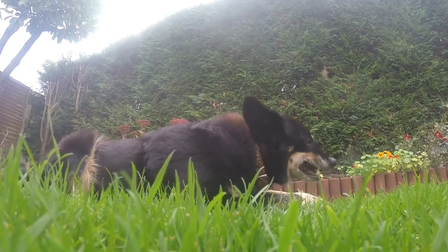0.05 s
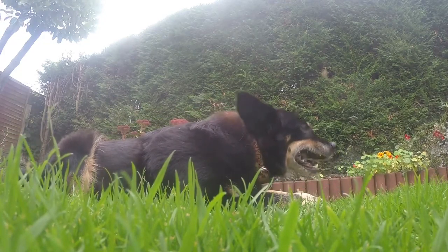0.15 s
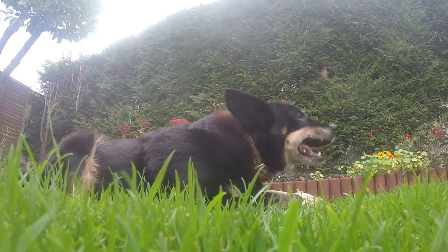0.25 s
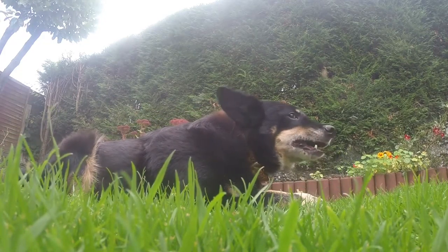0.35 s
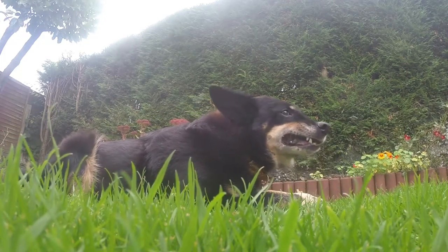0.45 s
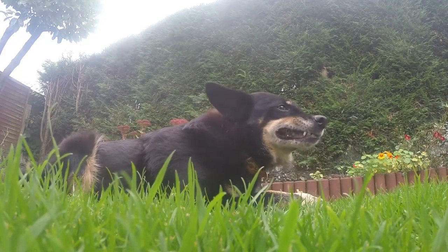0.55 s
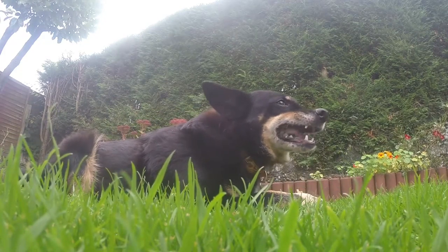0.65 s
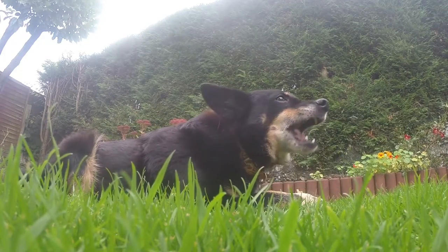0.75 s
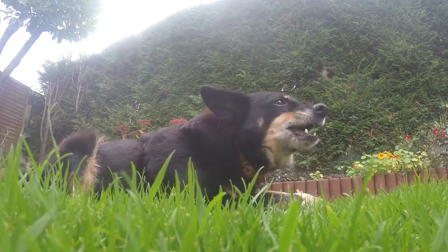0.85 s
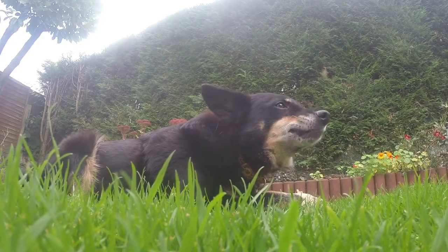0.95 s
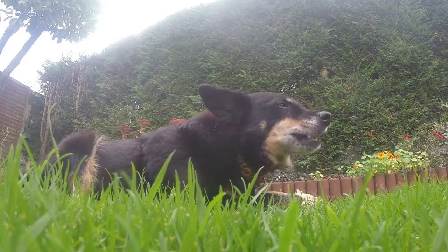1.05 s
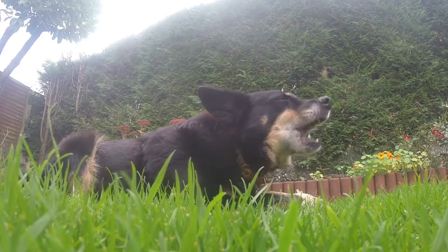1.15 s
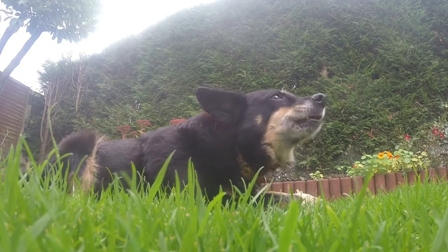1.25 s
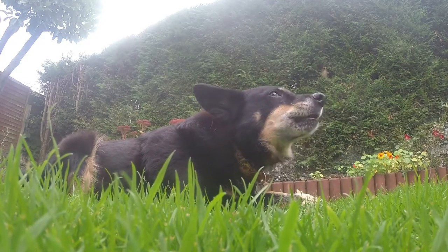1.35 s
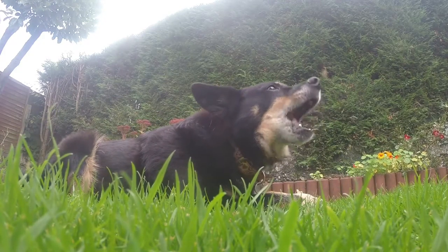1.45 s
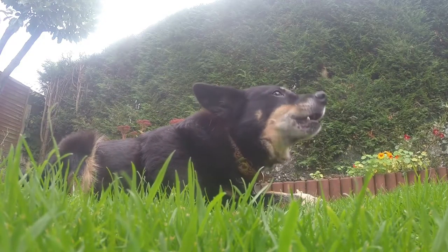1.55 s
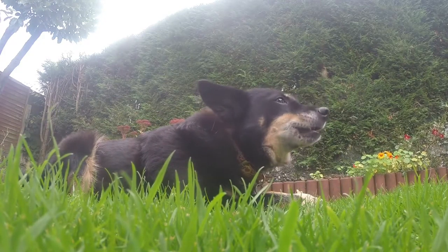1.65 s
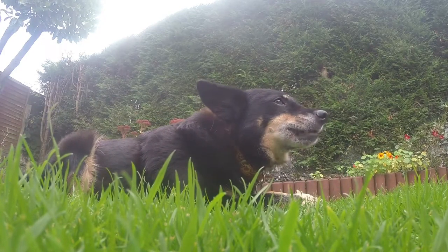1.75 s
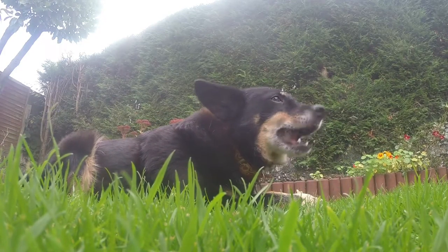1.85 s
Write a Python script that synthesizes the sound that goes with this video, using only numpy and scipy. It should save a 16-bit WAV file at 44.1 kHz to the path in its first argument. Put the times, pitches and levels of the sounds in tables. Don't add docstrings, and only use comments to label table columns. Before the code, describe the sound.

After two seconds of steady microphone hiss, a dog bites and cracks a bone on grass, then gnaws with scattered small clicks.

```python
import sys
import numpy as np
from scipy import signal
from scipy.fft import rfft, irfft, next_fast_len
from scipy.io import wavfile
from scipy.ndimage import map_coordinates

SR = 44100
rng = np.random.default_rng(int(sys.argv[2]) if len(sys.argv) > 2 else 0)


def boost(x):
    u = np.asarray(x, float) / 20
    return 10 ** u


def store_pcm(level_fs):
    pcm = np.round(np.clip(level_fs, -1, 1) * 32767).astype(np.int16)
    wavfile.write(sys.argv[1], SR, np.atleast_2d(pcm).T)


N = 291809

# (frequency [Hz], level per Hz [dB])
HISS_COLOUR = [(15, -31), (25, 2.5), (96, -1.5), (440, -10), (2620, -22.5), (4620, -27), (13500, -41),
               (15500, -42)]
# (frequency [Hz], width [Hz], level [dB])
WHINE = [(10060, 200, 5.5), (13300, 300, 2)]
# (frequency [Hz], level per Hz [dB])
RUMBLE_COLOUR = [(10, -7), (25, 2.5), (50, -14.5), (90, -9), (200, -53)]
# (time [s], level [dB], half length [s])
SHOVES = [(2.058, -51, 0.054), (2.34, -46, .03), (2.5, -47, .02), (2.571, -39, 0.037), (2.72, -43.5, 0.056),
          (2.953, -49, 0.047), (3.326, -52.5, 0.43), (3.78, -60, 0.036), (4.1, -55, .15),
          (4.374, -52, 0.068), (4.7, -51, 0.061), (5.1, -53, 0.088), (5.33, -48.5, 0.027), (5.59, -49, .07),
          (6.09, -49.5, 0.057), (6.52, -57, .08)]
# (time [s], peak [dB], swing [Hz], rise [s], time to fall 60 dB [s])
JOLTS = [
    (2.0425, -33, 34, .002, .07),
    (2.35, -37, 28, .0066, .15),
    (2.4594, -18.5, 55, .00062, .058),
    (2.562, -28.5, 27, .0087, .13),
    (2.695, -38, 35, .005, .1),
]
# (time [s], level [dB])
BITE = [(1.8, -81), (1.96, -66.5), (2.04, -60), (2.28, -68), (2.52, -44), (2.6, -59), (2.68, -55),
        (2.84, -65.5), (3.3, -64), (3.48, -76.5), (4.2, -68), (4.58, -63), (4.92, -78), (5.3, -71),
        (5.64, -68.5), (5.9, -80), (6.08, -57.5), (6.24, -72)]

MOUTH = [(1070, 180, -17.5), (1623, 340, 3)]
HOUSING = [(2140, 297, 3.5), (2643, 236, 7), (3298, 280, 0.5)]
ENAMEL = [(3670, 460, 0), (4280, 840, 0)]
BONE_WALL = [(5830, 470, -4), (6660, 200, -11), (7000, 830, -13.5)]
FIZZ = [(8480, 1000, 10.5), (10800, 2600, -1.5), (12800, 1500, -7)]
DUST = [(12000, 1500, 1), (13600, 1800, 0)]

POPS = [(2.1146, -49), (2.2384, -52), (2.2914, -50), (2.3106, -29.5), (2.316, -32), (2.321, -39),
        (2.3444, -47), (2.4514, -44), (2.4804, -41), (3.5518, -47.5), (4.2318, -49), (4.4233, -52),
        (4.5271, -46), (4.9975, -33.5), (5.0918, -51)]
SPITS = [
    (2.4593, -29),
    (2.6424, -40),
    (2.7774, -46),
    (2.9974, -56),
    (5.9813, -50),
    (6.1354, -44),
    (6.1414, -45),
]
KNOCKS = [(2.0669, -41), (2.1344, -52), (2.5152, -45), (2.6713, -43), (2.6944, -37), (2.7033, -34.5),
          (2.9113, -46), (3.675, -45), (3.8619, -42), (4.2527, -44), (4.4009, -41), (4.575, -46),
          (5.7069, -45), (6.0359, -43), (6.0569, -30), (6.096, -44), (6.1734, -47), (6.2033, -54)]
CLICKS = [(2.2064, -38.5), (2.3945, -34), (2.589, -47), (2.7257, -39), (2.7509, -34), (2.7644, -38),
          (2.8055, -32.5), (2.9806, -45), (3.0619, -49), (3.1244, -39), (3.1502, -44), (3.2261, -33.5),
          (3.2884, -37), (3.3483, -42), (3.6516, -41.5), (4.343, -32.5), (4.4712, -43.5), (4.5374, -43),
          (4.5914, -40), (4.6059, -34.5), (4.8384, -43), (5.0384, -35), (5.3572, -45), (5.7838, -45),
          (6.0112, -48), (6.0654, -34), (6.0864, -44), (6.1295, -32), (6.4729, -35.5), (6.4931, -45)]
NIPS = [
    (2.0819, -37),
    (2.4593, -17),
    (2.6064, -46),
    (2.8474, -31),
    (2.8764, -49),
    (2.9342, -35),
    (3.1717, -52),
    (3.2101, -37),
    (4.6813, -45),
    (6.3165, -48),
]
SNAPS = [
    (1.9634, -50),
    (2.6874, -38),
    (2.8174, -42),
    (3.1063, -34),
    (3.3044, -48),
    (4.1504, -41),
    (4.1579, -41),
    (5.2904, -43),
    (5.5757, -33.5),
    (5.9813, -36.5),
]

# (mouth [dB], enamel [dB], bone wall [dB], fizz [dB])
POP_COLOUR = (6.5, -20, -18, -18)
SPIT_COLOUR = (-10, -18, 0.5, -3)
KNOCK_COLOUR = (-3.5, -18, -15, -25)
CLICK_COLOUR = (-9, -25, -16, -26)
NIP_COLOUR = (-10.5, -4.5, -13.5, -25)
SNAP_COLOUR = (-9, -10, -9.5, -15)

# (time [s], peak [dB], tearing [s], bone wall [dB], fizz [dB])
CRACKS = [(1.991, -46, .001, -7, -25), (2.0, -46, 0.0045, -14, -28), (2.008, -37.5, 0.0047, -5, -19),
          (2.0175, -39.5, .01, -13, -25), (2.08, -46, .006, -18, -28), (2.2034, -44, 0.0049, -20, -28),
          (2.311, -33.5, 0.01, -3, -18.5), (2.478, -45, .021, -11, -15), (2.5307, -16, 0.015, -9, -17),
          (2.546, -22, 0.0024, -5, -27), (6.133, -51, 0.0069, -5, 2.5)]
# (mouth [dB], enamel [dB])
CRACK_COLOUR = (-5.5, -17)


def unit(x):
    return x / np.sqrt(np.mean(x ** 2) + 1e-20)


def along(points, hz):
    f, db = np.transpose(points)
    return np.interp(np.log(hz + 1), np.log(f + 1), db)


def curve(rows):
    s, db = np.transpose(rows)
    return np.interp(np.arange(N) / SR, s, db, left=-120)


def filtered(x, response):
    size = next_fast_len(len(x) + 8192)
    hz = np.fft.rfftfreq(size, 1 / SR)
    return irfft(rfft(x, size) * response(hz), size)[:len(x)]


def ringing(modes, f):
    total = 0
    for k, (center, width, db) in enumerate(modes):
        resonance = 1j * f * width / (center * center - f * f + 1j * f * width)
        total = total + (-1) ** k * boost(db) * resonance
    return total


def steep(modes):
    low_hz, high_hz = modes[0][0], modes[-1][0]
    broad = [(np.sqrt(low_hz * high_hz), 2 * (high_hz - low_hz) + 0.3 * low_hz, 0)]
    return lambda f: ringing(modes, f) * ringing(broad, f) ** 2


def fractures(events, tearing, fade_s):
    rise_s, first_break, first_s = 0.0004, 0.8, 0.0012
    bodies = (HOUSING, MOUTH, ENAMEL, BONE_WALL, FIZZ, DUST)
    t = np.arange(2048) / SR
    out = np.zeros(N + 4096)
    for (s, db, *shares_db), lasting in zip(events, tearing):
        uneven_sizes = boost(2.5 * rng.standard_normal(len(t)))
        breaks = rng.standard_normal(len(t)) * uneven_sizes
        breaks *= 1 - np.exp(-t / rise_s)
        breaks *= 1 + first_break * np.exp(-t / first_s)
        breaks *= np.exp(-np.maximum(t - lasting, 0) / fade_s)
        for modes, share_db in zip(bodies, (0, *shares_db)):
            ring = filtered(breaks, steep(modes))
            out[round(s * SR):][:len(t)] += boost(db + share_db) * ring / np.abs(ring).max()
    return out[:N]


def hiss():
    def response(f):
        whine_db = sum(db * np.exp(-((f - center) / width) ** 2) for center, width, db in WHINE)
        return boost(along(HISS_COLOUR, f) + whine_db)

    return boost(-55.5) * unit(filtered(rng.standard_normal(N), response))


def ground():
    jolts = np.zeros(N + SR)
    t = np.arange(SR // 2) / SR
    for s, db, hz, rise_s, t60 in JOLTS:
        swing = (1 - np.exp(-t / rise_s)) * np.cos(2 * np.pi * hz * t)
        jolts[round(s * SR):][:len(t)] -= boost(db - 60 * t / t60) * swing
    now = np.arange(N) / SR
    weight = sum(boost(db) * np.exp(-((now - s) / half) ** 2) for s, db, half in SHOVES)
    rumble = unit(filtered(rng.standard_normal(N), lambda f: boost(along(RUMBLE_COLOUR, f))))
    return jolts[:N] + boost(-4.5) * weight * rumble


def scrape():
    clumps_per_s = 120
    knots = rng.standard_normal(int(N * clumps_per_s / SR) + 4)
    clumps = map_coordinates(knots, [np.arange(N) * clumps_per_s / SR])
    total = 0
    for modes, db in ((HOUSING, 0), (MOUTH, -5), (ENAMEL, -13), (BONE_WALL, -15)):
        sizes = boost(3.5 * rng.standard_normal(N) + 3.5 * clumps)
        struck = rng.random(N) < 0.04
        grit = rng.standard_normal(N) * sizes * struck
        total = total + boost(db) * unit(filtered(grit, steep(modes)))
    return boost(curve(BITE) - 0.94) * total


def faint_ticks():
    per_s, base_db, grows = 9, -53.5, 0.34
    chance = rng.random((int(per_s * N / SR), 2))
    at = chance[:, 0] * N / SR
    bite_db = curve(BITE)[(at * SR).astype(int)]
    return zip(at, base_db + grows * (bite_db + 68) + 5 * chance[:, 1])


def ticks():
    kinds = ((POPS, POP_COLOUR), (SPITS, SPIT_COLOUR), (KNOCKS, KNOCK_COLOUR), (CLICKS, CLICK_COLOUR),
             (NIPS, NIP_COLOUR), (SNAPS, SNAP_COLOUR), (faint_ticks(), CLICK_COLOUR))
    rows = []
    for table, colour_db in kinds:
        for s, db in table:
            stray_db = 1.9 * rng.standard_normal(len(colour_db))
            rows.append((s, db, *(colour_db + stray_db)))
    return fractures(rows, np.zeros(len(rows)), fade_s=0.0011)


def cracks():
    rows = []
    for s, db, _, *bright_db in CRACKS:
        dust_db = -21 + 0.53 * (db + 17)
        rows.append((s, db, *CRACK_COLOUR, *bright_db, dust_db))
    return fractures(rows, [row[2] for row in CRACKS], fade_s=0.0032)


def scene():
    return (hiss() + ground() + scrape() + boost(-7.0) * ticks() + cracks())[None]


def thinned_treble(x):
    top_hz, patchy_above_hz, lost_share = 15250, 12800, 0.3
    hz, _, z = signal.stft(x, SR, nperseg=1024)
    size = np.abs(z)
    clicks = size[(hz > 1200) & (hz < 4000)].mean(axis=0)
    sudden = np.diff(np.log(clicks + 1e-9), append=0) > 0.7
    patches = rng.random((len(hz) // 8 + 1, z.shape[1] // 3 + 1))
    patches = np.repeat(np.repeat(patches, 8, axis=0), 3, axis=1)[:len(hz), :z.shape[1]]
    quiet = size < 6 * np.median(size, axis=1, keepdims=True)
    lost = ((patches < lost_share) | sudden) & quiet & (hz[:, None] > patchy_above_hz)
    kept = z * ~lost * (hz[:, None] < top_hz)
    return signal.istft(kept, SR, nperseg=1024)[1][:N]


def low_pass(x):
    return signal.sosfilt(signal.butter(12, 15640, fs=SR, output="sos"), x)


def record(dry):
    mix = thinned_treble(dry[0])[None]
    return low_pass(mix)


dry = scene()
out = record(dry)
store_pcm(out)
```